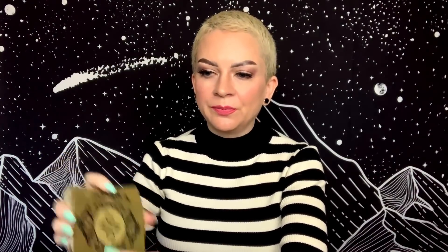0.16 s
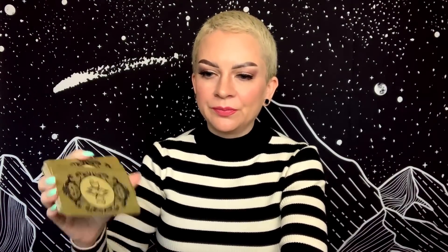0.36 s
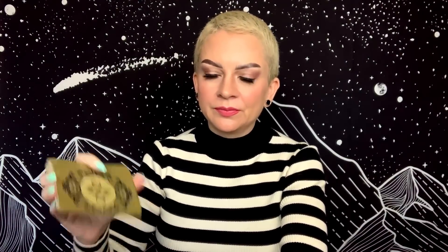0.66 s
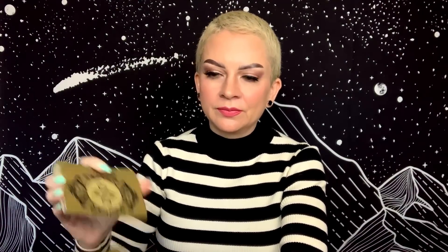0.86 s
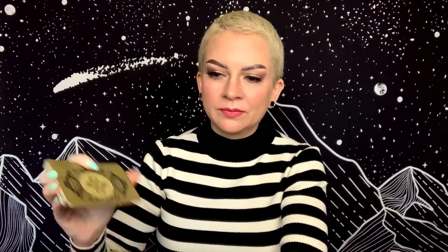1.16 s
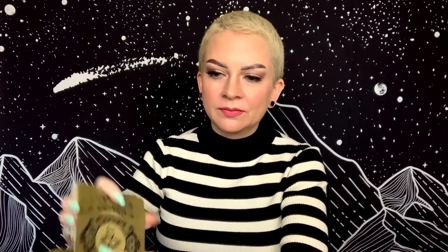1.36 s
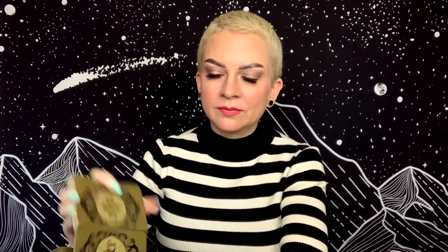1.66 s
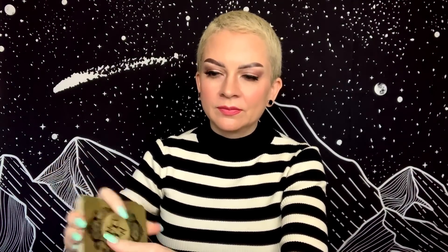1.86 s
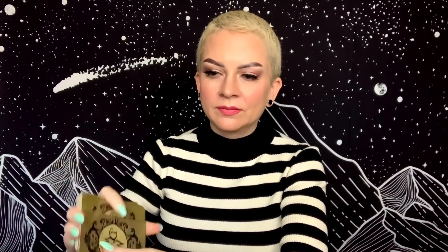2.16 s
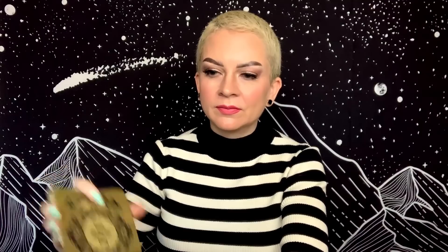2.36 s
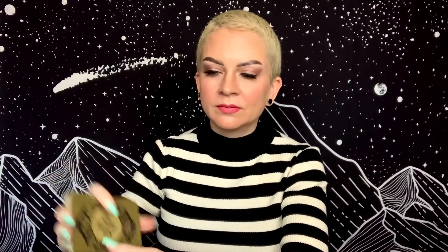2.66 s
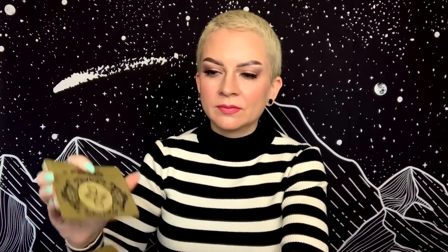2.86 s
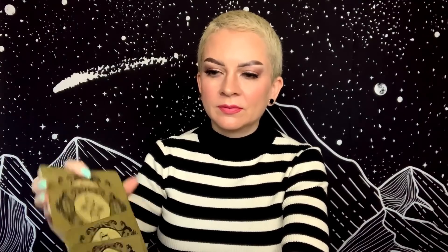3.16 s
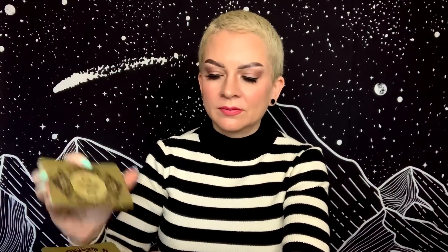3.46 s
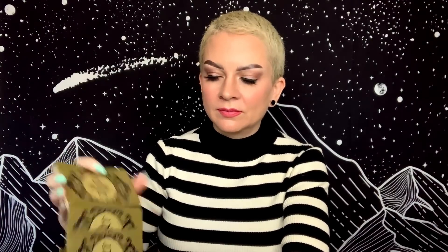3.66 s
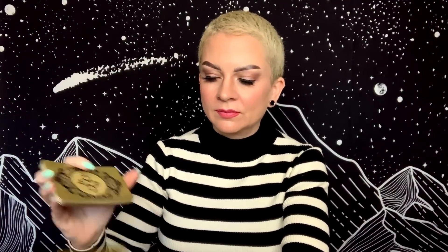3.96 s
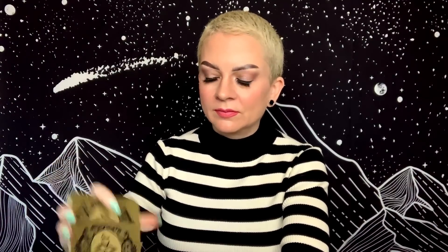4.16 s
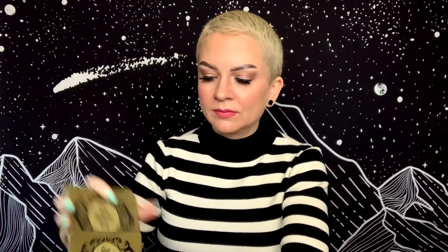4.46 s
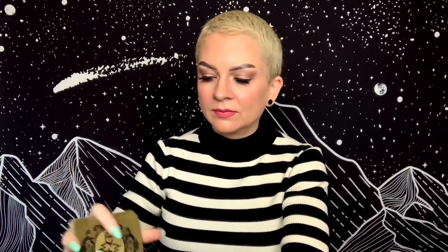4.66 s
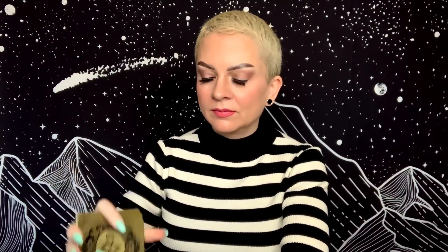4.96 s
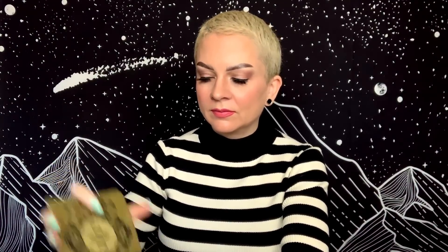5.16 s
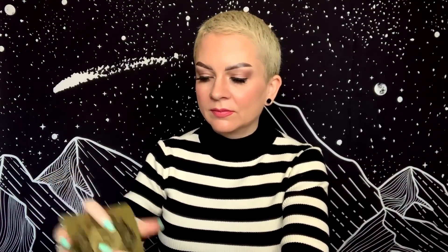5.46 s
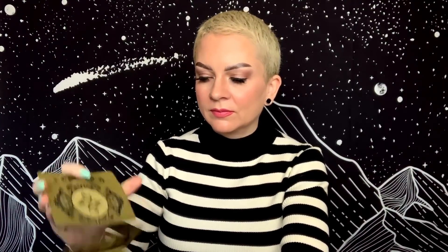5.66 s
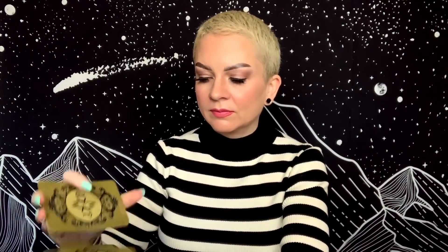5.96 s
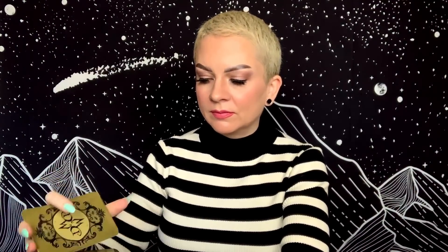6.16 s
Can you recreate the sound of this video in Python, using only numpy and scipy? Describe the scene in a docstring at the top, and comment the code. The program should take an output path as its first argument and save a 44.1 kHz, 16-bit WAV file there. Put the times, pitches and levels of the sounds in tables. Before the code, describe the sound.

Large stiff cards shuffled overhand in a small quiet room, brisk hissing slides and sharp slaps, about three or four a second, then stopping.

```python
"""Hissing slides, sharp slaps and low booms: large stiff cards shuffled overhand in a small quiet room.
Each stroke: a packet touches the deck, slides down it (shaped noise), slaps home (decaying rattle through
resonances) and squeezes out a puff of air (low-passed pressure pulse). Jolts ring the low table modes.
Brief stick-slip tones, moving arms, short echoes (decaying noise tails) and room tone complete the scene."""
import sys
import numpy as np
from scipy import signal
from scipy.fft import rfft, irfft, next_fast_len
from scipy.io import wavfile
from scipy.ndimage import uniform_filter1d, map_coordinates

SR = 44100
rng = np.random.default_rng(int(sys.argv[2]) if len(sys.argv) > 2 else 0)


def inscribe(sig):
    """Save sig as 16-bit PCM at rate SR to the path in sys.argv[1].

    A 1-D sig is mono; a 2-D sig holds one channel per row.
    Samples are clipped to [-1, 1] before scaling.
    """
    pcm = np.round(np.clip(np.atleast_2d(sig).T, -1, 1) * 32767)
    wavfile.write(sys.argv[1], SR, pcm.astype(np.int16))


N = 277830

# Room tone spectrum. Each row: frequency in Hz, relative density in dB per Hz.
AIR_SPECTRUM = [(15, -38.5), (25, 7.5), (87, -8.5), (223, -21), (317, -19.5), (363, -21), (545, -19.5),
                (796, -27.5), (16000, -59)]
AIR_RMS_DB = -50.5
# Echo decay. Each row: frequency in Hz, t60 in seconds.
ROOM_DECAY = [(100, 0.19), (500, 0.31), (3000, 0.29), (12000, 0.19)]
# Arms and cloth moving. Each row: time in seconds, level in dB.
SWAY_LEVEL = [(0, -47), (2, -49.5), (4.001, -47), (5.8, -48), (6.049, -54.5), (6.3, -63)]
# Spectrum of that movement. Each row: frequency in Hz, relative density in dB per Hz.
SWAY_SPECTRUM = [(15, -15.5), (30, 3.5), (60, 3), (110, -30), (200, -13), (600, -34), (1500, -45.5)]
# Table modes. Each row: frequency in Hz, mean relative level in dB, t60 in seconds.
TABLE_MODES = [(63.2, 4.5, 0.2), (94.8, -9, 0.48), (43.5, -11, 0.095), (81, -10.5, 0.24),
               (108.9, -13, 0.36)]
# Strokes. Each row: fastest slide in seconds, first touch in ms before it, swell in ms, hiss level in dB,
# dull scrape in dB relative to hiss, arm jolt gain in dB, landing jolt gain in dB,
# closing in ms after the fastest slide, puff gain in dB.
STROKES = [(0.017, 17.8, 72, -51, 12, -28, -39, 56, -45),
           (0.251, 79, 5.3, -31.5, 0, -28, -26.5, 36.3, -24.5),
           (0.512, 56, 5.3, -25, 0, -25, -22, 47, -23.5), (.785, 61, 6.1, -27, 3, -25, -28, 50, -26.5),
           (1.077, 76, 22.6, -29, -7, -27.5, -25.5, 27, -25.5),
           (1.361, 69, 10.5, -26.5, -4.7, -28, -24, 43.6, -24),
           (1.617, 33.5, 6.2, -25.5, -12, -21.5, -24.5, 56, -24),
           (1.919, 75, 12, -25.5, -5.3, -25.5, -35, 47.5, -26),
           (2.208, 90, 12, -30.5, -0.5, -24.5, -29.5, 49, -29),
           (2.468, 88, 18.3, -32.5, 7.5, -27, -26.5, 23, -29.5),
           (2.758, 84, 14.6, -28, -5, -37, -32, 42, -22.5), (3.062, 111, 16, -32, -7, -26.5, -45, 65, -48),
           (3.295, 76, 5.6, -30, 1.2, -27, -30.5, 76, -24.5),
           (3.621, 92, 19, -35, 5.5, -24.5, -29, 80, -32.5), (3.875, 82, 11, -29, -3, -26.5, -24, 27, -29),
           (4.152, 73, 18.4, -33.5, 1.5, -24.5, -26.5, 68, -23.5),
           (4.436, 78, 18, -27.5, -7, -28.5, -32, 68, -27.5),
           (4.706, 75, 12.6, -33, 3.5, -25.5, -36, 73, -26), (5.002, 94, 12, -27, -5.5, -27, -36, 45, -36),
           (5.258, 82, 25, -36.5, 2, -28.5, -31, 33, -31.5),
           (5.565, 113, 46, -42, -1.5, -26, -47, 130, -46), (5.7, 64, 27, -59, 20, -33, -31, 37, -33),
           (5.794, 64, 8.2, -36, 4, -50, -38, 34, -48)]
# Lighter brushes of card on card, mostly fainter than the strokes. Each row: fastest slide in seconds,
# hiss level in dB, dull scrape in dB relative to hiss, rise and fall in ms.
BRUSHES = [(0.427, -50.5, 0, 9.7), (2.245, -46.5, 8.5, 16), (3.135, -61, 15, 12), (3.236, -59.5, 5, 18),
           (3.365, -53.5, 8, 35), (3.513, -44.5, 1.5, 12), (3.712, -54, 16, 17), (5.31, -36, -10, 13),
           (5.457, -53.5, 5, 17), (5.505, -48, 1.5, 12), (5.969, -61, 1.5, 20)]
FALL_SHARE = 0.3  # stop time over the time from fastest slide to closing
# Friction spectra: early slide, late slide, light touch, dull scrape.
# Each row: frequency in Hz, relative density in dB per Hz.
EARLY_SPECTRUM = [(1500, -9.5), (3000, -12.5), (4600, -3.5), (6000, 3), (8000, -0.5), (10400, -10),
                  (16000, -17.5)]
LATE_SPECTRUM = [(2000, -16), (5000, -12.5), (7500, 2), (9000, 1.5), (11000, -0.5), (13000, -1.5),
                 (16000, -2)]
TOUCH_SPECTRUM = [(1500, -17.5), (4000, -2.5), (6500, -10), (8000, 5), (9500, -7.5), (13000, -5),
                  (16000, -15)]
SCRAPE_SPECTRUM = [(60, 19), (120, 13.5), (180, 14), (250, 1), (550, -14.5), (1000, 1), (2300, -3.5),
                   (3500, -3.5), (6000, -24.5)]
# Singing cards. Each row: start in seconds, peak level in dB, frequency in Hz, length in ms.
SQUEAKS = [(.265, -21.5, 2420, 9), (.56, -44, 607, 60), (.58, -50, 1680, 73), (1.081, -23, 2340, 6.6),
           (1.634, -32.5, 2180, 20), (3.668, -37, 585, 53), (4.705, -16, 1640, 6), (5.27, -22, 2380, 12),
           (5.571, -32.5, 4000, 16.7)]
# Card contacts. Each row: start in seconds, card peak in dB,
# flatness in dB (hollow knock over edge snap), knock frequency in Hz.
TAPS = [(0.0168, -10, -7, 476), (.1645, -35.5, -21.5, 366), (0.19, -40, -15, 400), (.23, -10, 9.5, 430),
        (.2699, -22, -6.5, 455), (0.284, -24.5, -1, 424), (0.3626, -37, -4, 892), (0.5114, -6.5, 14, 556),
        (.5177, -18.5, -12.5, 554), (0.555, -13, -14, 903), (0.7202, -33.5, -16, 315),
        (0.7815, -6, -2, 409), (0.8138, -20, -2.5, 394), (0.833, -14, -15, 483), (.998, -21, -28.5, 940),
        (1.0448, -31, 0, 474), (1.061, -20, 14.5, 473), (1.0879, -17.5, 2.5, 514), (1.1069, -28, 1, 887),
        (1.199, -40, -10, 392), (1.2293, -31, -8.5, 343), (1.258, -39.5, -9.5, 309),
        (1.2812, -32, -17, 520), (1.357, -10, -3, 382), (1.3673, -13.5, 9, 454), (1.3846, -16, -7, 767),
        (1.4063, -31, 8, 474), (1.5749, -17.5, -15.5, 890), (1.6102, -35.5, 14.5, 315),
        (1.6185, -24, 14.5, 396), (1.631, -28.5, 28, 270), (1.6674, -24.5, 14, 477),
        (1.8368, -20, -19.5, 337), (1.9077, -12.5, 9.5, 513), (1.944, -22, 0.5, 497), (1.9681, -27, 5, 350),
        (2.113, -23.5, -15.5, 375), (2.173, -12, 10, 540), (2.2337, -22, -5, 500), (2.2432, -18, -30, 290),
        (2.2503, -22, -10, 450), (2.3805, -30.5, -17, 403), (2.3834, -22, -21, 355),
        (2.4204, -26, 2.5, 462), (2.4675, -15.5, 1.5, 397), (2.6607, -20, -18, 326),
        (2.7305, -20, 4.5, 510), (2.7784, -22.5, 6.5, 794), (2.8, -24.5, 4.5, 371),
        (2.9492, -21.5, -16.5, 358), (3.0007, -18, 0, 422), (3.2033, -34, 13, 760), (3.2121, -21, -1, 530),
        (3.236, -27, 10, 352), (3.2907, -14, -8, 585), (3.3009, -17, 20, 563), (3.3661, -12, -8.5, 478),
        (3.408, -32, -11, 804), (3.5229, -17.5, -24, 280), (3.5948, -11, 9.5, 348), (3.665, -12.5, 3, 592),
        (3.706, -14, -17, 446), (3.7143, -26, 8, 818), (3.8001, -20.5, -15.5, 760),
        (3.876, -18, -15.5, 925), (3.8808, -17.5, 14.5, 550), (3.9427, -12.5, -12.5, 357),
        (3.951, -40.5, -11, 400), (4.0805, -33, -12, 396), (4.156, -14.5, 18.5, 380),
        (4.2212, -22.5, 19.5, 550), (4.359, -35.5, -19, 322), (4.499, -15, 9.5, 498),
        (4.6309, -36.5, -8.5, 325), (4.6416, -44.5, -12, 366), (4.7, -32.5, -10, 400),
        (4.7033, -11, 8.5, 305), (4.7731, -11.5, -4, 516), (4.9049, -38.5, -16, 315),
        (4.9806, -19, 10, 580), (5.0258, -26, 5, 614), (5.0715, -31, -9, 373), (5.1836, -34.5, -20.5, 310),
        (5.2007, -32, -1.5, 780), (5.271, -12, 9, 620), (5.2765, -11, -2, 326), (5.3005, -8, -19.5, 543),
        (5.3028, -14, -12.5, 548), (5.3083, -22.5, -2, 542), (5.4928, -43, -10, 393),
        (5.5164, -32.5, 15.5, 766), (5.617, -40.5, -1, 700), (5.643, -26.5, 4.5, 346),
        (5.6665, -16.5, -5, 280), (5.673, -25.5, 17.5, 603), (5.695, -21.5, 8, 505),
        (5.7127, -18, -6.5, 275), (5.7204, -18, 3.5, 286), (5.7356, -24, -1.5, 359),
        (5.8094, -21.5, 9, 680), (5.827, -32.5, 23.5, 278), (5.8567, -32, -3, 781), (5.916, -33, 6, 364),
        (5.96, -41, 3.5, 794), (5.9722, -43.5, -17, 296)]
# Bending card, then thin edge. Each row: frequency in Hz, width in Hz, relative level in dB.
CARD_MODES = [(1440, 824, 0.5), (2550, 920, 1.5), (3790, 1114, -2.5)]
EDGE_MODES = [(5025, 2200, 1.5), (8540, 2760, 2.5), (12000, 1700, -2)]
KNOCK_DB, SNAP_DB = -5, -4  # over the card, at zero flatness
KNOCK_SHARE = 0.46  # the knock's share of the flatness
RATTLE_MS, RATTLE_MS_PER_DB = 4.16, 0.1039  # median time to fall 20 dB; flatter contacts rattle longer
SOFT_HZ, TOP_HZ = 15800, 16800  # start of the weakened top, band limit


def amp(db):
    """Decibels to gain."""
    return 10 ** (np.asarray(db) / 20)


def unit(x):
    """Scaled to rms 1."""
    return x / np.sqrt(np.mean(x ** 2) + 1e-20)


def along(points, hz):
    """Interpolate (Hz, value) points on a log frequency axis."""
    f, v = np.transpose(points)
    return np.interp(np.log(hz + 1), np.log(f + 1), v)


def wobble(knots_per_s):
    """A smooth random curve through normal knots."""
    knots = rng.standard_normal(int(N * knots_per_s / SR) + 4)
    return map_coordinates(knots, [np.arange(N) * knots_per_s / SR])


def filtered(x, response):
    """x through a complex response of frequency in Hz."""
    m = next_fast_len(N + SR // 2)
    return irfft(rfft(x, m) * response(np.fft.rfftfreq(m, 1 / SR)), m)[..., :N]


def body(modes):
    """Causal response of a few resonances, summed with alternating signs."""
    def response(f):
        return sum((-1) ** k * amp(db) * 1j * f * width / (hz * hz - f * f + 1j * f * width)
                   for k, (hz, width, db) in enumerate(modes))
    return response


def noise(spectrum, patchy_db):
    """Coloured noise of rms 1 with time-frequency patches of random gain."""
    z = signal.stft(rng.standard_normal(N), nperseg=256)[2]
    patches = uniform_filter1d(rng.standard_normal(z.shape), 6, 0)
    patches = uniform_filter1d(patches, 4, 1)
    x = signal.istft(z * amp(patchy_db * unit(patches)), nperseg=256)[1][:N]
    return unit(filtered(x, lambda hz: amp(along(spectrum, hz))))


def room_tone():
    """Steady air noise of the quiet room, mostly low."""
    return amp(AIR_RMS_DB) * noise(AIR_SPECTRUM, patchy_db=3.0)


def room(x):
    """Each frequency dies at its own speed; every quarter second of sound gets its own noise tail."""
    wet, step = np.zeros(N + SR), SR // 4
    for start in range(0, N, step):
        hz, t, z = signal.stft(rng.standard_normal(SR // 2), SR, nperseg=256)
        decay = amp(-60 * t / along(ROOM_DECAY, hz)[:, None])
        tail = signal.istft(z * decay, SR, nperseg=256)[1]
        echo = signal.fftconvolve(x[start:start + step], tail / np.linalg.norm(tail))
        wet[start + 130:][:len(echo)] += echo  # echoes begin 130 samples late
    return wet[:N]


def sway():
    """A low uneven rumble while the arms move."""
    level_db = np.interp(np.arange(N) / SR, *np.transpose(SWAY_LEVEL)) + 2.5 * wobble(14)
    return amp(level_db) * noise(SWAY_SPECTRUM, patchy_db=3.5)


def table():
    """First touches and landings jolt the table; each jolt rings its low modes at new strengths."""
    t = np.arange(SR // 2) / SR
    boom = np.zeros(N + SR)
    jolts = []
    for s, lead_ms, _, _, _, arm_db, land_db, _, _ in STROKES:
        jolts += [(max(s - lead_ms / 1000, 0), arm_db), (s, land_db)]
    for s, jolt_db in jolts:
        ring = np.zeros(len(t))
        for hz, mode_db, t60 in TABLE_MODES:
            decay = amp(mode_db + rng.normal(0, 0.61) - 60 * t / t60)
            ring += decay * np.sin(2 * np.pi * (hz * t + rng.random()))
        boom[round(s * SR):][:len(t)] += amp(jolt_db) * ring * (1 - np.exp(-t / 0.02))
    return boom[:N]


def puffs():
    """Pressure builds while the gap closes, peaks as it shuts, then drops to a suction that fades."""
    t = np.arange(-SR // 20, SR // 10) / SR
    build = 1.12 * np.exp(-(t / 0.038) ** 2) + .4 * np.exp(-(t / 0.0045) ** 2)
    suction = -.4 * np.exp(-(t / 0.021) ** 2)
    pressure = np.where(t < 0, build, suction)
    air = np.zeros(N + SR)
    for s, *_, close_ms, puff_db in STROKES:
        start = round((s + t[0]) * SR + close_ms * SR / 1000)
        air[start:][:len(t)] += amp(puff_db) * pressure
    return filtered(air[:N], lambda hz: 1 / (1 + 1j * hz / 250))


def squeaks():
    """Fast stick-slip of a card gives a short wavering tone."""
    out = np.zeros(N + SR)
    for s, db, hz, length_ms in SQUEAKS:
        t = np.arange(round(length_ms * SR / 1000)) / SR
        drift_rad = np.cumsum(rng.normal(0, 0.074, SR // 10))[:len(t)] * hz / 2300
        tone = np.sin(2 * np.pi * hz * t + drift_rad)
        out[round(s * SR):][:len(t)] += amp(db) * np.hanning(len(t)) * tone
    return out[:N]


def rubs():
    """Every slide as (s, hiss dB, drag ms, rise ms, fall ms, scrape dB); a stroke drags from its first touch."""
    strokes = [(s, db, lead_ms, rise_ms, FALL_SHARE * close_ms, dull_db)
               for s, lead_ms, rise_ms, db, dull_db, _, _, close_ms, _ in STROKES]
    brushes = [(s, db, 2 * ms, ms, ms, dull_db) for s, db, dull_db, ms in BRUSHES]
    return strokes + brushes


def slides():
    """Friction of coated card faces: a light drag, a swell as the packet speeds up, a quick stop."""
    before = SR // 6
    t_ms = np.arange(-before, before) / SR * 1000
    late_share = 1 / (1 + np.exp(-t_ms / 21.0))  # the hiss thins as the overlap of the cards shrinks
    levels = np.zeros((4, N + SR))
    for s, db, drag_ms, rise_ms, fall_ms, dull_db in rubs():
        side_ms = np.where(t_ms < 0, rise_ms, fall_ms)
        swell = np.exp(-np.abs(t_ms / side_ms) ** 1.8) * (t_ms > -drag_ms)
        onset = np.clip((t_ms + drag_ms) / (0.37 * drag_ms), 0, 1) ** 2.7
        touch = amp(-17.0) * onset * (t_ms < 0)
        dull = amp(dull_db) * (swell + 0.43 * touch)
        curves = np.array([swell * (1 - late_share) ** .5, swell * late_share ** .5, touch, dull])
        levels[:, round(s * SR):][:, :len(t_ms)] += amp(db) * curves
    grip = amp(1.5 * wobble(90))  # the grip catches and lets go
    early, late, touch, dull = levels[:, before:before + N] * grip

    hiss = early * noise(EARLY_SPECTRUM, patchy_db=2)
    hiss += late * noise(LATE_SPECTRUM, patchy_db=2)
    hiss += touch * noise(TOUCH_SPECTRUM, patchy_db=2)

    # card edges snag on each other, 700 times a second on average
    catches = (rng.random(N) < 700 / SR) * rng.standard_normal(N) * rng.exponential(size=N) ** .25
    ringing = filtered(catches, lambda hz: body(CARD_MODES)(hz) + .6 * body(EDGE_MODES)(hz))
    snags = amp(-2.5) * unit(ringing)
    scrape = amp(2.2 * wobble(200)) * noise(SCRAPE_SPECTRUM, patchy_db=2)
    return hiss * amp(2 * wobble(400)) + dull * (scrape + snags)


def taps():
    """A sharp blow and short rattle through hollow, card and edge; returns near sound and room feed."""
    t = np.arange(SR // 25) / SR
    hz = np.fft.rfftfreq(2 * len(t), 1 / SR)
    near, far = np.zeros((2, N + SR))
    for s, db, flat_db, knock_hz in TAPS:
        knock_db = KNOCK_DB + KNOCK_SHARE * flat_db
        snap_db = SNAP_DB - (1 - KNOCK_SHARE) * flat_db
        # the air pocket between the packets
        hollow = [(knock_hz, 0.49 * knock_hz, 0), (2.7 * knock_hz, 500, -11)]
        parts = np.array([body(modes)(hz) for modes in (hollow, CARD_MODES, EDGE_MODES)])

        fall_ms = (RATTLE_MS + RATTLE_MS_PER_DB * flat_db) * amp(rng.normal(0, 0.87))
        decay = amp(-20 * t * 1000 / np.clip(fall_ms, .4, 20))
        rattle = rng.standard_normal((3, len(t))) * decay
        # first touch: a flat face pushes air, an edge flicks back
        rattle[:, 0] = 4.97 * amp(-.2 * flat_db) * np.sign(flat_db + 1.5)
        sound = irfft(rfft(rattle, 2 * len(t)) * parts)[:, :len(t)]
        peaks = amp(db + np.array([[knock_db], [0], [snap_db]]))
        sound *= peaks / np.abs(sound).max(axis=1, keepdims=True)

        # heard from all sides, the rattle blurs into one plain blow of equal energy
        blow = irfft(parts)[:, :len(t)]
        blow *= np.linalg.norm(sound, axis=1, keepdims=True) / np.linalg.norm(blow, axis=1, keepdims=True)
        near[round(s * SR):][:len(t)] += sound.sum(axis=0)
        far[round(s * SR):][:len(t)] += blow.sum(axis=0)
    return near[:N], far[:N]


def scene():
    """Room tone, arms, table, puffs and cards; taps and slides also feed the echo."""
    near, far = taps()
    rubbing = slides()
    echo = amp(-11.5) * room(far + rubbing)
    cards = near + rubbing + squeaks()
    return (room_tone() + sway() + table() + puffs() + echo + cards)[None]


def record(dry):
    """The microphone loses the lowest bass; the top drops, then stops at the band limit."""
    def response(hz):
        bass_cut = 1j * hz / (12 + 1j * hz)
        top = np.where(hz < SOFT_HZ, 1, amp(-26.5)) * (hz < TOP_HZ)
        return bass_cut * top
    return filtered(dry, response)


dry = scene()
out = record(dry)
inscribe(out)
```